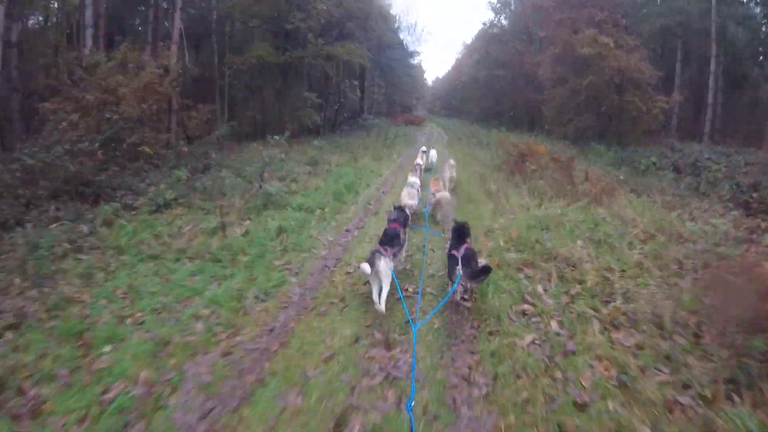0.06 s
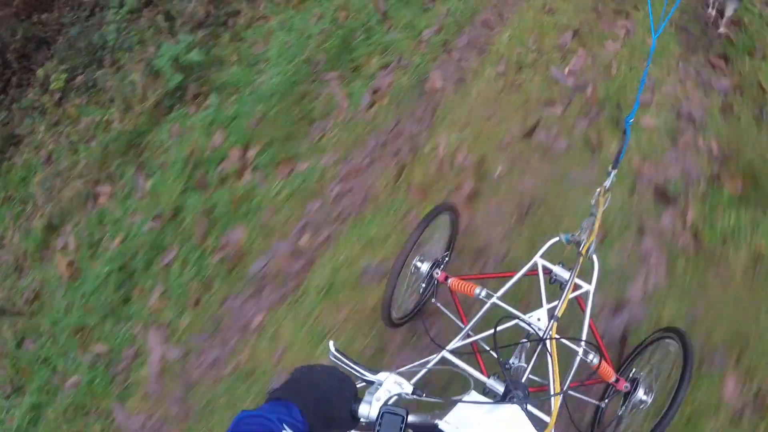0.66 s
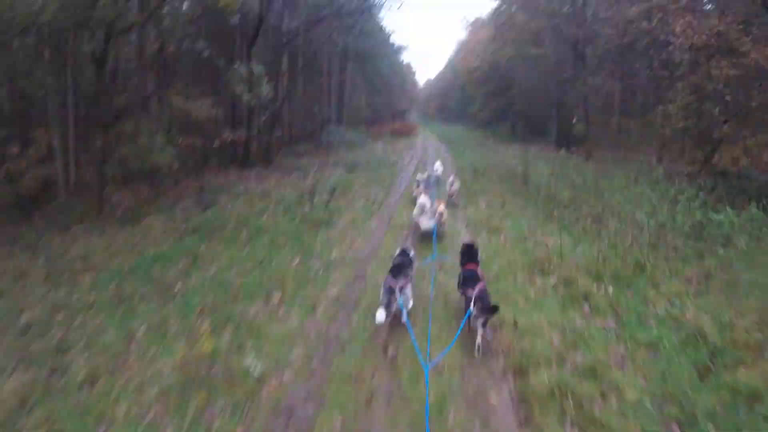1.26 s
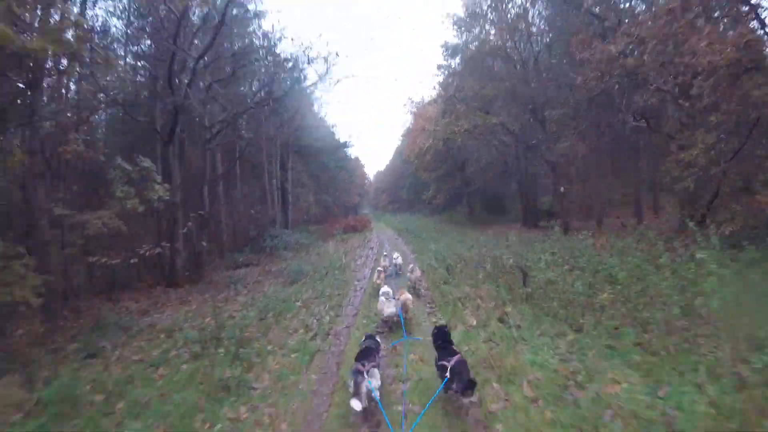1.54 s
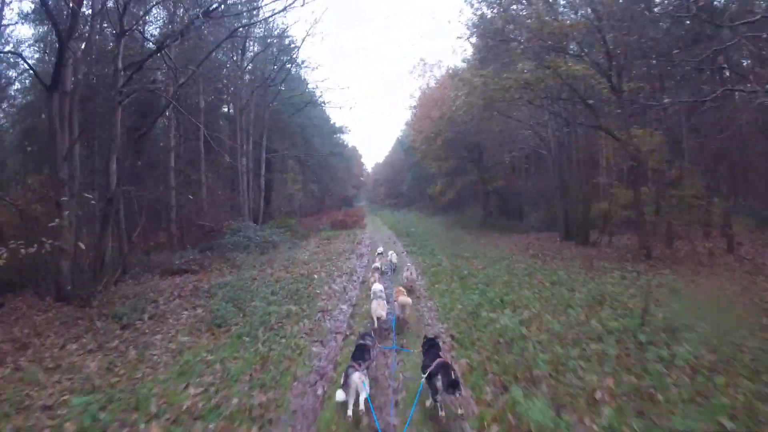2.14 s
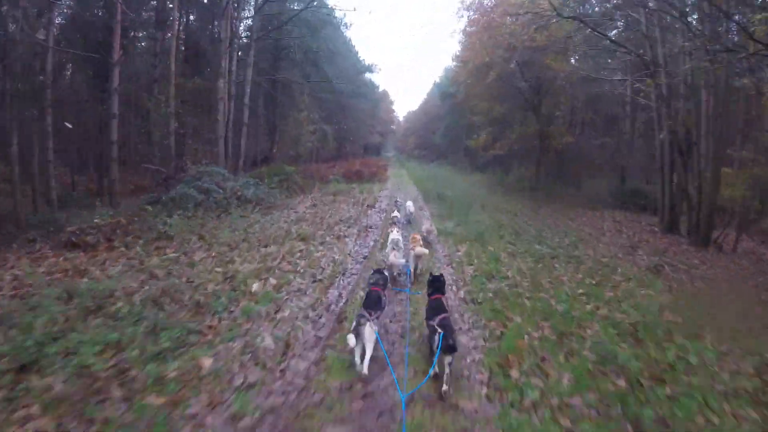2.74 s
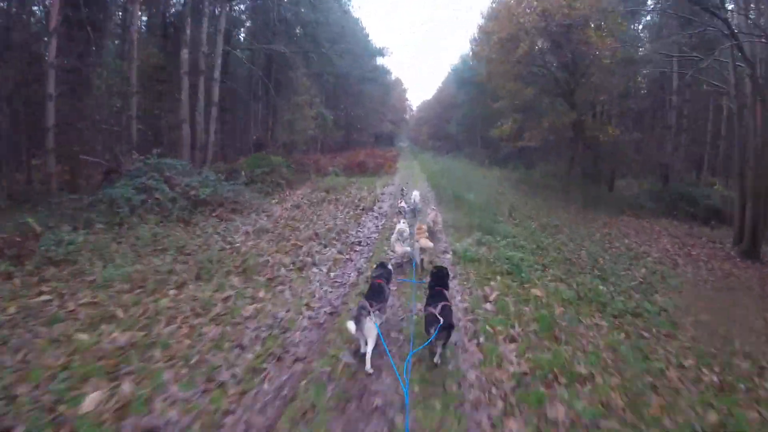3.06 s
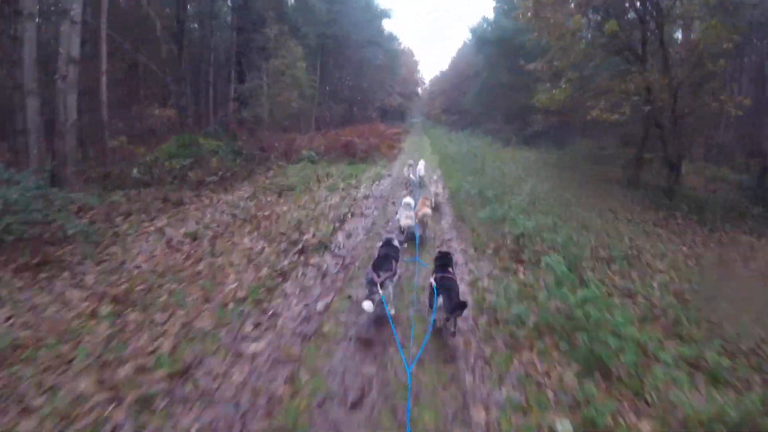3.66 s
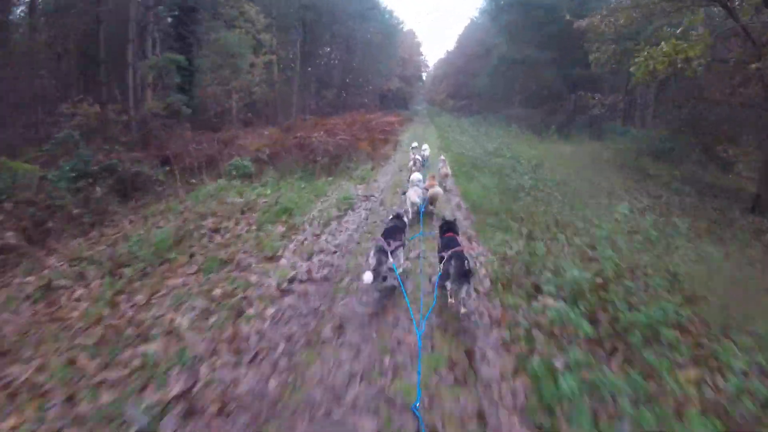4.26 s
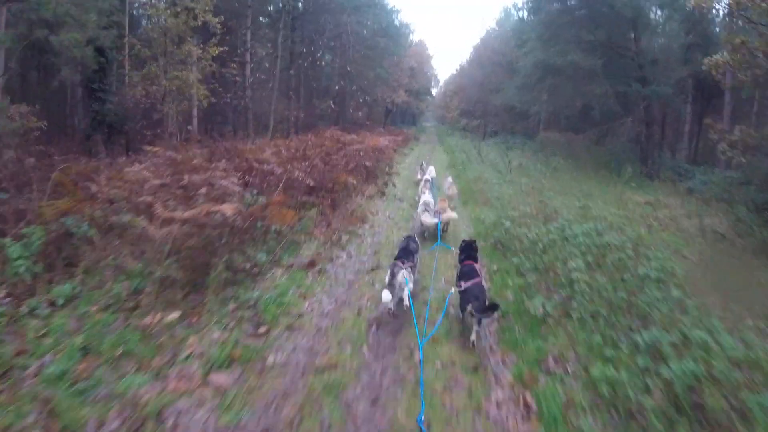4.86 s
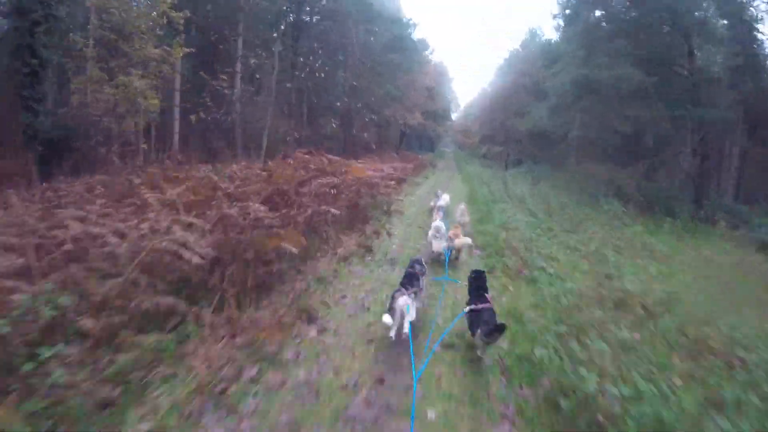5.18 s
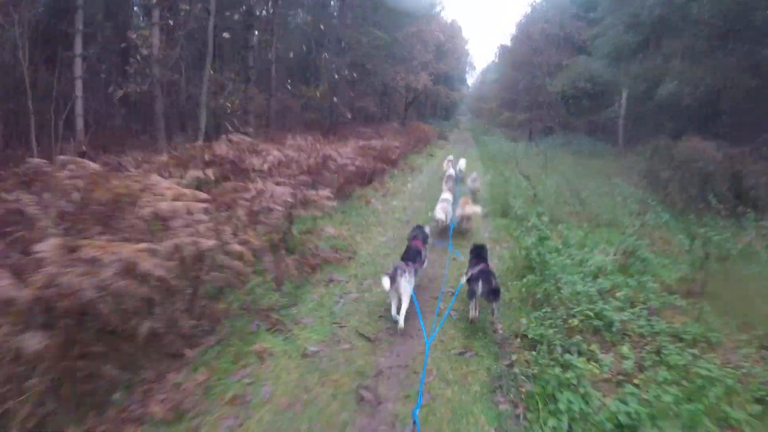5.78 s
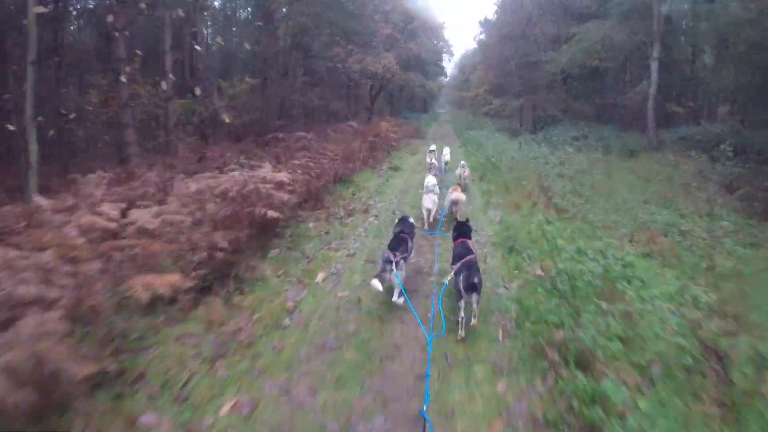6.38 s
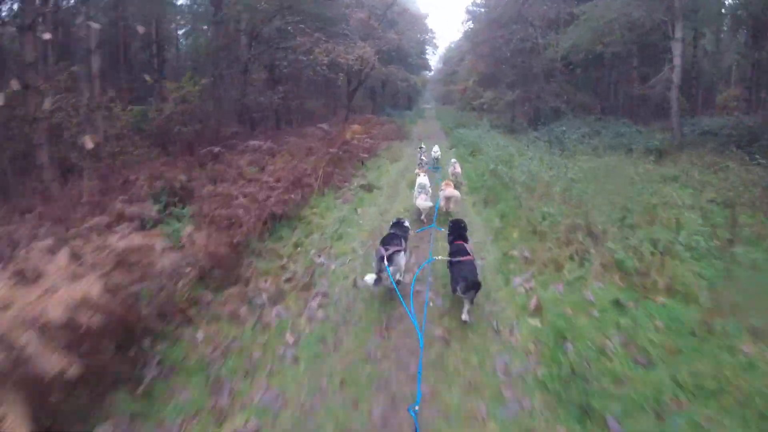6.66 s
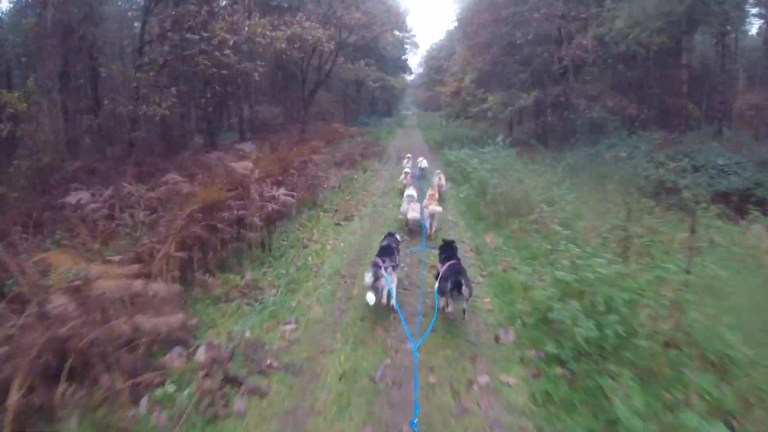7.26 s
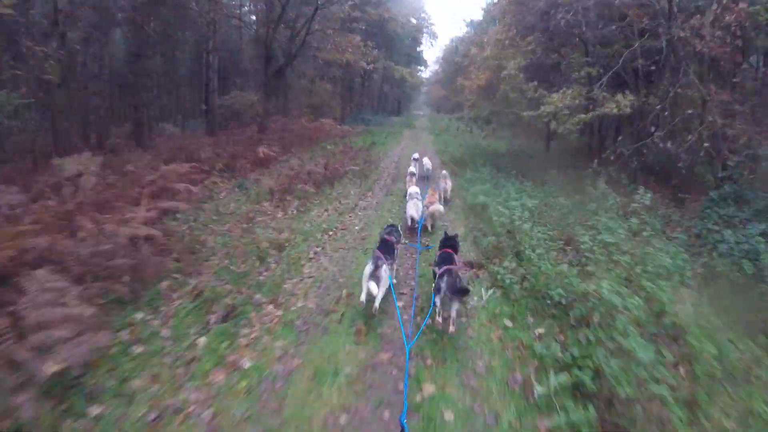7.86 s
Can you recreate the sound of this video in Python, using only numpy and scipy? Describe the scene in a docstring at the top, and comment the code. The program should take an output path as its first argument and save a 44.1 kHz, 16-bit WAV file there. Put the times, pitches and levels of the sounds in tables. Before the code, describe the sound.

Gusty wind rumble over the quick metallic clinks and clacks of a steel cart rolling through grass and dead leaves.

```python
"""Wind buffets the microphone; tyres swish through grass and dead leaves; a steel frame hums and clacks.
A dog team pulls a three-wheeled rig fast along a forest track, heard from the driver's head.
Eddies rumble and drone, and roar as the head dips; air hoots and whistles across the housing's edges.
Jolts knock a fitting against the frame about eight times a second; small fittings chatter between."""
import sys
import numpy as np
from scipy import signal
from scipy.fft import rfft, irfft
from scipy.io import wavfile
from scipy.ndimage import uniform_filter1d, minimum_filter1d

SR = 44100
rng = np.random.default_rng(int(sys.argv[2]) if len(sys.argv) > 2 else 0)


def store_wav(level_fs):
    """Save 16-bit WAV to argv[1]."""
    pcm = np.round(np.clip(np.atleast_2d(level_fs), -1, 1) * 32767)
    wavfile.write(sys.argv[1], SR, pcm.T.astype(np.int16))


N = 353241
TIME_S = np.arange(N) / SR

# Airflow at the microphone; the dipped head is briefly in the lee: (time [s], level re usual flow [dB])
AIRFLOW = [(0, -4.5), (.49, -10), (.58, -4.5), (.68, 0.5), (.74, 8.5), (.96, 9), (1.02, -29), (1.21, -26),
           (1.32, 3), (2.1, 4.5), (2.62, 1), (2.95, 2), (3.33, -1.5), (4.17, 1), (4.5, -6.5), (4.85, 1),
           (5.35, 2.5), (5.55, -4.5), (6, -2), (6.25, 2), (6.65, -3.5), (7.05, 2.5), (7.33, -3), (7.56, 2),
           (7.82, 2.5), (8, -6.5)]
# Dulling of the rig's top octave; the wind roar swells with it: (time [s], treble loss [dB])
TREBLE_LOSS = [(0, 1.5), (.65, 2), (1.2, 8), (2.2, 16), (3, 7), (4.1, 4.5), (4.5, 5), (6, 0.5), (8, 0)]
# Large, medium and small eddies: (frequency [Hz], relative density [dB])
RUMBLE_SPECTRUM = [(8, -13), (22, 0.5), (60, -2), (100, -3.5), (140, -8.5), (200, -28), (400, -50.5),
                   (2000, -79), (12000, -112)]
BUFFET_SPECTRUM = [(50, -22), (100, -3), (140, -0.5), (220, -0.5), (310, -6), (500, -17.5), (900, -37.5),
                   (2000, -51.5), (5000, -83), (12000, -108)]
ROAR_SPECTRUM = [(150, -27), (350, 3.5), (500, 0.5), (720, -2.5), (1100, -9), (1600, -16.5), (2500, -22.5),
                 (4000, -45.5), (9000, -95.5), (12000, -100)]
# Hollow drone: (time [s], level at usual flow [dB])
DRONE_LEVEL = [(1.6, -37), (2.5, -22), (5.35, -22), (5.9, -27)]
# Ground under the tyres: (time [s], relative grass level [dB], relative leaf level [dB])
GROUND_COVER = [(0, -37.5, -40.5), (.64, -39, -41.5), (1.12, -41.5, -48.5), (1.17, -52, -47.5),
                (1.9, -46, -47), (2.3, -51.5, -44.5), (3.35, -42, -39.5), (3.95, -44.5, -38.5),
                (4.62, -39.5, -40.5), (4.82, -46.5, -44.5), (5.35, -40.5, -41), (5.8, -46, -46),
                (6.8, -45, -50), (7.08, -41.5, -45), (7.45, -48.5, -52), (8, -37.5, -44.5)]
# Grass swish, leaf crunch: (frequency [Hz], relative density [dB])
GRASS_SPECTRUM = [(2500, -4), (4400, -17), (5400, 3), (6100, 3.5), (7300, -0.5), (8700, -8), (10200, -9),
                  (11700, -21), (14000, -20.5), (15500, -53)]
LEAF_SPECTRUM = [(300, -30), (900, 0.5), (1500, 1), (2100, -2.5), (2800, -6), (3600, -10.5), (4300, -15.5),
                 (6000, -18), (9000, -16), (12000, -47.5)]
# Rolling frame's resonances: (frequency [Hz], width [Hz], relative level [dB])
FRAME_MODES = [(586, 44, -23.5), (811, 120, 6.5), (974, 16, -3), (1185, 41, 3), (1328, 48, 0),
               (1657, 200, -1.5), (1964, 250, -1)]
# Thin whine of the rig: (time [s], level [dB], pitch [Hz])
RIG_WHINE = [(0, -32, 808), (.12, -50, 796), (.2, -65, 790), (.98, -62, 680), (1.06, -53, 710),
             (1.16, -44, 726), (1.27, -44, 770), (1.4, -80, 770)]
# Small loose fittings: (pitch [Hz], relative ping level [dB])
FITTING_PINGS = [(3550, -6), (4800, -1), (5350, 2), (5850, -2.5), (6400, -0.5), (6950, -3), (8600, -8)]
# Struck steel: (frequency [Hz], relative level [dB], T60 [s])
STEEL_MODES = [(2300, -22, .1), (2577, -11, 0.076), (3635, -6.5, 0.076), (4820, -8, 0.071),
               (5160, -2.5, 0.076), (5550, -34, 0.056), (5770, -7, 0.11), (6040, -15, 0.1),
               (6320, -2, 0.072), (6930, 0.5, 0.054), (6650, -5, 0.037), (8400, -20, 0.15),
               (9200, -25, 0.079)]
# Blows on the frame, a few of them quick rebounds of the blow just before: (time [s], strength [dB], loose
# part's pitch [Hz])
HARD_CLACKS = [(0.0962, -8.5, 5780), (0.3087, -7.5, 6000), (0.439, -10, 6100), (0.5613, -10, 5700),
               (0.6428, -6.5, 5810), (0.7444, -16, 6770), (0.984, -14.5, 6540), (1.141, -20.5, 5390),
               (1.259, -21.5, 6350), (1.578, -22.5, 6920), (1.7259, -23.5, 5210), (2.5295, -24.5, 5810),
               (2.7633, -21, 6940), (2.87, -18.5, 5820), (2.9826, -23.5, 5800), (3.1215, -22, 5180),
               (3.2353, -17, 5270), (3.3513, -15.5, 5200), (3.514, -16, 5760), (3.6438, -18.5, 5850),
               (4.1235, -20, 5230), (4.503, -16.5, 6900), (4.6247, -18, 5300), (4.7265, -15, 6000),
               (4.8528, -20, 6330), (4.9502, -21.5, 5200), (5.352, -19.5, 5940), (5.476, -15, 6270),
               (5.4984, -16, 5850), (5.6156, -11, 6630), (5.7333, -7, 6860), (5.8453, -9, 6840),
               (5.867, -16.5, 5700), (6.0138, -22.5, 6350), (6.117, -17.5, 6550), (6.1334, -21, 6170),
               (6.2674, -17.5, 6830), (6.3027, -17, 6840), (6.3689, -29, 5670), (6.4448, -16.5, 6320),
               (6.5883, -16.5, 5330), (6.7108, -14, 6700), (6.793, -24.5, 5570), (6.8488, -19.5, 6090),
               (6.9703, -14.5, 6800), (7.0806, -16, 6300), (7.1924, -13.5, 6750), (7.2067, -23, 5730),
               (7.3012, -24, 5770), (7.3472, -22, 5900), (7.6128, -20.5, 6310), (7.7068, -17, 5860),
               (7.8016, -12, 6420), (7.911, -18, 6030), (7.9914, -16, 6340)]
# Bright and low parts of a contact: (frequency [Hz], relative density [dB])
CLINK_SPECTRUM = [(2500, -34), (4300, -14.5), (5100, -4), (5800, 0), (6900, 0), (7600, -4), (8800, -9.5),
                  (10200, -13.5), (11000, -20.5), (11800, -45.5), (14000, -33), (15200, -60)]
KNOCK_SPECTRUM = [(400, -16), (1200, 8), (1700, 9.5), (2050, 14.5), (2500, 10.5), (3100, 9), (3600, 8),
                  (4300, 1.5), (6000, -17.5), (11000, -45)]
# Low knock, strongest on the bare, leafy stretch: (time [s], gain [dB])
KNOCK_GAIN = [(1.1, -19), (1.6, -12), (2.8, -14), (3.2, -10), (3.7, -10), (4.6, -15), (8, -19.5)]
# Two gusts across a housing gap; a lower howl in the second: (time [s], level [dB], pitch [Hz])
GAP_GUSTS = [(.6, -55, 1290), (.65, -28, 1360), (.71, -30, 1410), (.73, -16.5, 1100), (.9, -20, 1060),
             (.96, -25.5, 1300), (.985, -62, 1250), (1.85, -70, 1060), (2.06, -22.5, 1060),
             (2.5, -70, 1000)]
GUST_HOWL = [(1.7, -66, 380), (1.9, -19, 366), (2.05, -25, 515.4), (2.28, -21.5, 528.4), (2.42, -27.5, 482),
             (2.6, -82, 477)]
# Fluty wind whistles: (centre time [s], length [s], pitch [Hz], level [dB])
WIND_WHISTLES = [(1.41, 0.033, 2500, -41), (1.432, 0.016, 2550, -30), (1.449, 0.039, 2800, -35),
                 (1.722, 0.026, 2500, -30), (1.8, 0.053, 2430, -30), (1.85, 0.14, 2600, -40),
                 (1.953, 0.11, 2530, -36.5), (2.041, 0.1, 2200, -34.5), (7.04, 0.15, 2270, -38),
                 (7.148, 0.021, 1650, -30.5)]


def gain(db):
    return 10 ** (np.asarray(db) / 20)


def unit_rms(x):
    return x / np.sqrt(np.mean(x ** 2) + 1e-20)


def curves(rows):
    """Each value column of a time table, at every sample."""
    times_s, *columns = np.transpose(rows)
    return [np.interp(TIME_S, times_s, column) for column in columns]


def add(mix, start_s, sound):
    span = mix[max(round(start_s * SR), 0):][:len(sound)]
    span += sound[:len(span)]


def coloured(x, spectrum, size=16384):
    """Minimum-phase filter of unit energy; spectrum interpolated over log frequency."""
    hz, db = np.transpose(spectrum)
    bins_hz = abs(np.fft.fftfreq(size, 1 / SR))
    log_gain = np.log(gain(np.interp(np.log(bins_hz + 1), np.log(hz + 1), db)))
    response = np.exp(np.conj(signal.hilbert(log_gain)))
    taps = np.fft.ifft(response).real[:size // 2]
    return signal.fftconvolve(x, taps / np.linalg.norm(taps))[:len(x)]


def noise(spectrum):
    return unit_rms(coloured(rng.standard_normal(N), spectrum))


def wander(rate_hz):
    """Random drift up to about rate_hz, unit RMS."""
    hz = np.fft.rfftfreq(N, 1 / SR)
    return unit_rms(irfft(rfft(rng.standard_normal(N)) / (1 + (hz / rate_hz) ** 4), N))


def fuzzy_tone(hz, width_hz, size=N):
    """Narrow noise around hz (number or curve), unit RMS."""
    r = np.exp(-np.pi * width_hz / SR)
    waver = signal.lfilter([1], [1, -2 * r, r * r], rng.standard_normal((2, size)))
    phase = 2 * np.pi * np.cumsum(hz * np.ones(size)) / SR
    return unit_rms(waver[0] * np.cos(phase) + waver[1] * np.sin(phase))


def resonate(x, hz, width_hz):
    r = np.exp(-np.pi * width_hz / SR)
    return 2 * signal.lfilter([1 - r], [1, -r * np.exp(2j * np.pi * hz / SR)], x).real


def ticks(per_s, spread_db):
    """Random clicks, most small, a few large."""
    size = gain(spread_db * np.minimum(rng.exponential(1, N), 4)) * rng.choice([-1, 1], N)
    return unit_rms(size * (rng.random(N) < per_s / SR))


def wind(lee_db=-13, full_db=1.1, tear_db=2.5):
    """One flow, three eddy sizes: large ones rumble and level off; smaller ones buffet and roar."""
    (flow_db,), (treble_loss_db,) = curves(AIRFLOW), curves(TREBLE_LOSS)
    flutter_db = 1.36 * wander(rate_hz=57)
    surge_db = np.maximum(flow_db - tear_db, 0)  # strong flow tears away from the housing
    rumble_db = -15 + 0.51 * np.clip(flow_db, lee_db, full_db)
    buffet_db = -21.5 + flow_db + flutter_db
    roar_db = -33 + 0.57 * flow_db + surge_db + 0.46 * treble_loss_db + flutter_db
    return (noise(RUMBLE_SPECTRUM) * gain(rumble_db)
            + noise(BUFFET_SPECTRUM) * gain(buffet_db)
            + noise(ROAR_SPECTRUM) * gain(roar_db))


def drone(growth_db_per_db=1.6, full_db=2):
    """A hollow low resonance swells with the flow, up to a limit."""
    swell_db = growth_db_per_db * np.minimum(curves(AIRFLOW)[0], full_db)
    return fuzzy_tone(hz=153, width_hz=38) * gain(curves(DRONE_LEVEL)[0] + swell_db)


def crackle(per_s, fade_s):
    """Many tiny breakages, each a puff of noise."""
    t = np.arange(SR // 40) / SR
    power = signal.fftconvolve(ticks(per_s, spread_db=3.6) ** 2, np.exp(-t / fade_s))[:N]
    return unit_rms(np.sqrt(abs(power)) * rng.standard_normal(N))


def tyres(grass_trim_db=-1, leaf_trim_db=5):
    """Grass swishes and leaves snap under the wheels, unevenly with the ground."""
    grass_db, leaf_db = curves(GROUND_COVER)
    bumps_db = 1.2 * wander(rate_hz=30)
    swish = unit_rms(rng.standard_normal(N) + crackle(per_s=450, fade_s=0.001))
    crunch = unit_rms(rng.standard_normal(N) + 0.8 * crackle(per_s=400, fade_s=0.0015))
    return (coloured(swish, GRASS_SPECTRUM) * gain(grass_db + grass_trim_db + bumps_db)
            + coloured(crunch, LEAF_SPECTRUM) * gain(leaf_db + leaf_trim_db + bumps_db))


def frame_hum(settled_db=-47.5, start_boost_db=18, settle_s=0.34):
    """Rough ground keeps the tubes trembling, loudest at the start."""
    hum = sum(gain(db) * fuzzy_tone(hz, width_hz) for hz, width_hz, db in FRAME_MODES)
    return unit_rms(hum) * gain(settled_db + start_boost_db * np.exp(-TIME_S / settle_s))


def whine(octave_db=-7):
    """A thin tone from the rig comes and goes, with its octave."""
    db, hz = curves(RIG_WHINE)
    return gain(db) * (fuzzy_tone(hz, width_hz=14) + gain(octave_db) * fuzzy_tone(2 * hz, width_hz=28))


def contact(t, t60_s, rise_s=0.00021, tail_db=-15, tail_t60_s=0.24):
    """Loose parts meet: a dense burst of tiny blows, then a weak after-rattle."""
    burst = gain(-60 * t / t60_s)
    tail = gain(tail_db - 60 * t / tail_t60_s)
    attack = 1 - np.exp(-t / rise_s)
    return attack * np.hypot(burst, tail) * unit_rms(rng.standard_normal(len(t)))


def steel_ring(t, spread_db=4, detune=0.0013, rise_s=0.0017):
    """Each blow lands elsewhere and excites the modes in a different mix."""
    hz, db, t60_s = np.transpose(STEEL_MODES)[:, :, None]
    share, shift, phase = rng.standard_normal((3, len(STEEL_MODES), 1))
    size = gain(db + spread_db * share)
    cycles = hz * (1 + detune * shift) * t + phase
    modes = size * gain(-60 * t / t60_s) * np.sin(2 * np.pi * cycles)
    return modes.sum(0) / np.linalg.norm(size) * (1 - np.exp(-t / rise_s))


def chatter(ping_t60_s=0.037, rolling_db=-4, shaken_db=-31, settle_s=0.085):
    """Small fittings jiggle as the tyres run, each with its own ping; harder just after a clack."""
    t = np.arange(SR // 6) / SR
    taps, jolts = np.zeros((2, N))
    for hz, db in FITTING_PINGS:
        ping = gain(-60 * t / ping_t60_s) * np.sin(2 * np.pi * hz * t)
        click = coloured(contact(t, t60_s=0.015), CLINK_SPECTRUM)
        tap = unit_rms(click) + 0.5 * unit_rms(steel_ring(t)) + gain(db) * unit_rms(ping)
        taps += signal.fftconvolve(ticks(per_s=7, spread_db=2), tap)[:N]
    for time_s, db, _ in HARD_CLACKS:
        add(jolts, time_s, gain([db]))
    shaken = gain(shaken_db) * signal.lfilter([1], [1, -np.exp(-1 / (settle_s * SR))], jolts)
    rolling = gain(curves(GROUND_COVER)[0] + rolling_db)
    return unit_rms(taps) * np.hypot(rolling, shaken)


def blows(swing_s=0.12, jitter_s=0.0087, soft_db=-30, spread_db=2, soft_hz=5800, spread_hz=400):
    """Hard clacks, plus a soft tap per swing between them: (time [s], strength [dB], pitch [Hz])."""
    rows = list(HARD_CLACKS)
    for (start_s, _, _), (end_s, _, _) in zip(HARD_CLACKS, HARD_CLACKS[1:]):
        swings = max(round((end_s - start_s) / swing_s), 1)
        for time_s in np.linspace(start_s, end_s, swings + 1)[1:-1]:
            late, force, pitch = rng.standard_normal(3)
            rows.append((time_s + jitter_s * late,
                         soft_db + spread_db * force,
                         soft_hz + spread_hz * pitch))
    return rows


def clacks(clink_db=-9.5, ring_db=-9, part_db=-15.5, knock_db_per_db=0.7):
    """Each jolt knocks a loose part against the frame: bright clink, low knock; both pieces ring."""
    t = np.arange(SR // 6) / SR
    clink, knock, ring = np.zeros((3, N))
    for time_s, db, hz in blows():
        burst = gain(db) * contact(t, t60_s=0.058)
        part_ring = unit_rms(resonate(burst, hz, width_hz=130)) * burst.std()
        add(clink, time_s, burst)
        add(knock, time_s, gain(knock_db_per_db * db) * contact(t, t60_s=0.071, rise_s=0.00068))
        add(ring, time_s, gain(db + ring_db) * steel_ring(t) + gain(part_db) * part_ring)
    return (gain(clink_db) * coloured(clink, CLINK_SPECTRUM)
            + gain(curves(KNOCK_GAIN)[0]) * coloured(knock, KNOCK_SPECTRUM)
            + ring)


def housing_tones(overtone_ratio=1.6, overtone_db=-14):
    """Air across the housing's edges: hollow gusts, a howl, brief fuzzy whistles."""
    (gust_db, gust_hz), (howl_db, howl_hz) = curves(GAP_GUSTS), curves(GUST_HOWL)
    gust = fuzzy_tone(gust_hz, width_hz=360)
    gust += gain(overtone_db) * fuzzy_tone(overtone_ratio * gust_hz, width_hz=800)
    tones = gain(gust_db) * gust + gain(howl_db) * fuzzy_tone(howl_hz, width_hz=130)
    for centre_s, length_s, hz, db in WIND_WHISTLES:
        whistle = fuzzy_tone(hz, width_hz=340, size=int(length_s * SR))
        add(tones, centre_s - length_s / 2, gain(db) * whistle * np.hanning(len(whistle)))
    return tones


def dull_treble(x, corner_hz=8300):
    """The top octave dulls for a few seconds while the wind roar swells, then clears."""
    low = signal.sosfiltfilt(signal.butter(4, corner_hz, fs=SR, output="sos"), x)
    return low + (x - low) * gain(-curves(TREBLE_LOSS)[0])


def scene():
    """Air at the microphone plus the rig, mono."""
    rig = tyres() + frame_hum() + whine() + chatter() + clacks()
    return (wind() + drone() + housing_tones() + dull_treble(rig))[None]


def record(dry):
    """A limiter eases down the strongest gusts; then a low-pass."""
    ceiling, window_samples, cutoff_hz = 0.94, 401, 15100
    safe_gain = np.minimum(1, ceiling / (abs(dry[0]) + 1e-9))
    held_gain = minimum_filter1d(safe_gain, window_samples)
    limited = dry * uniform_filter1d(held_gain, window_samples)
    lowpass = signal.firwin(511, cutoff_hz, window=("kaiser", 9), fs=SR)
    return signal.oaconvolve(limited, lowpass[None], "same")


dry = scene()
out = record(dry)
store_wav(out)
```